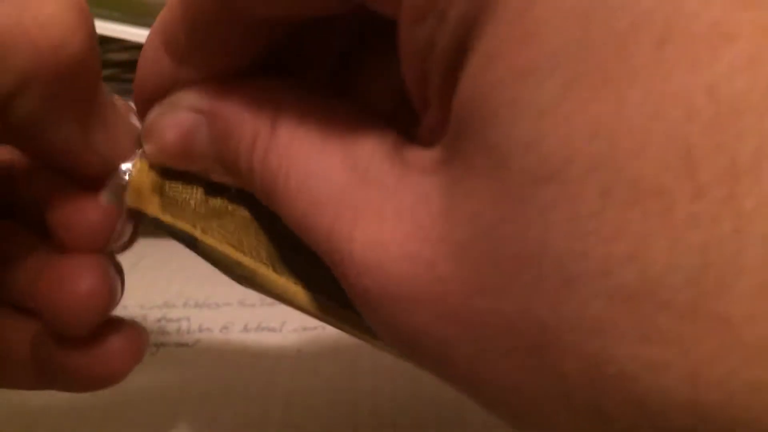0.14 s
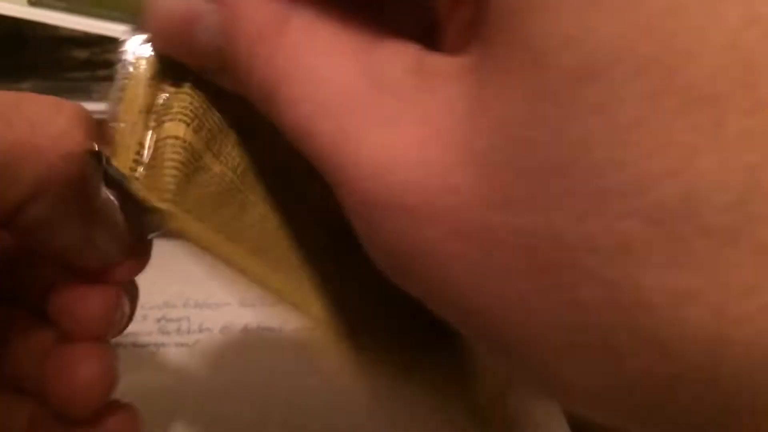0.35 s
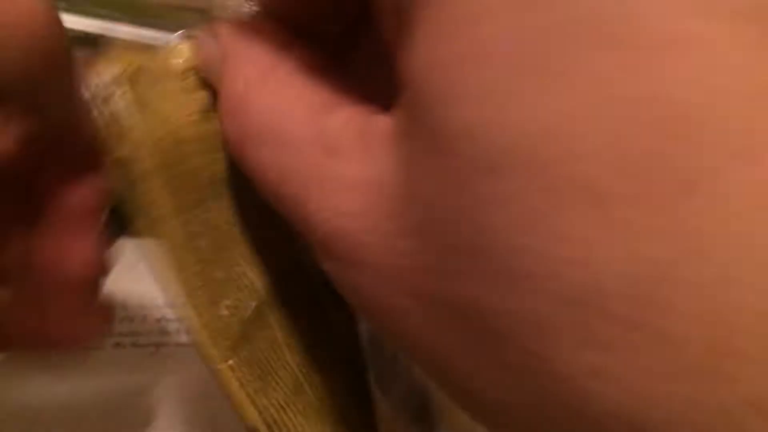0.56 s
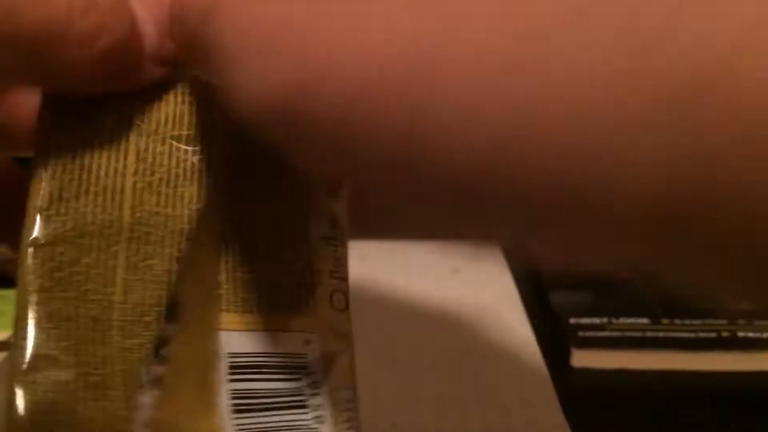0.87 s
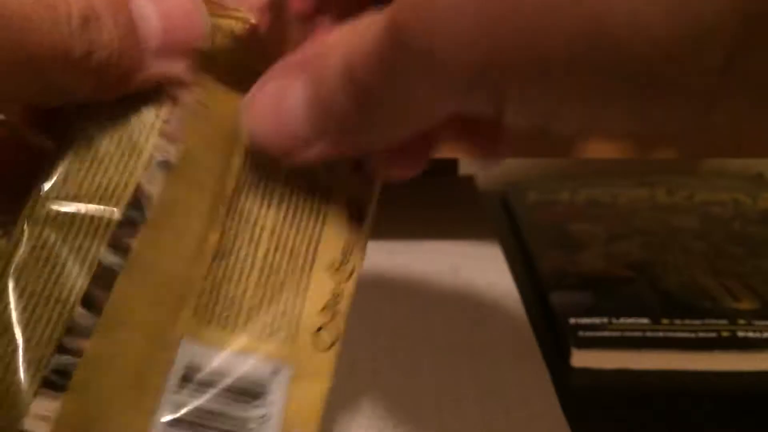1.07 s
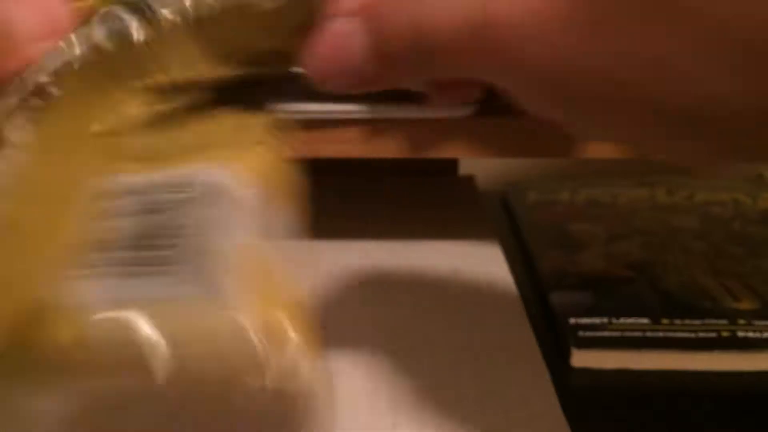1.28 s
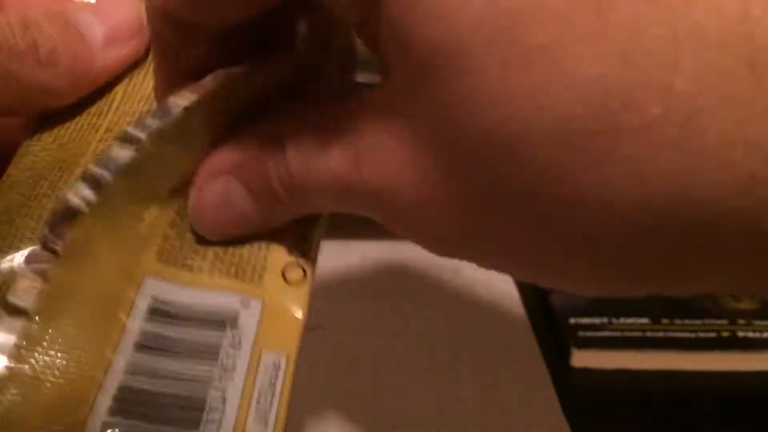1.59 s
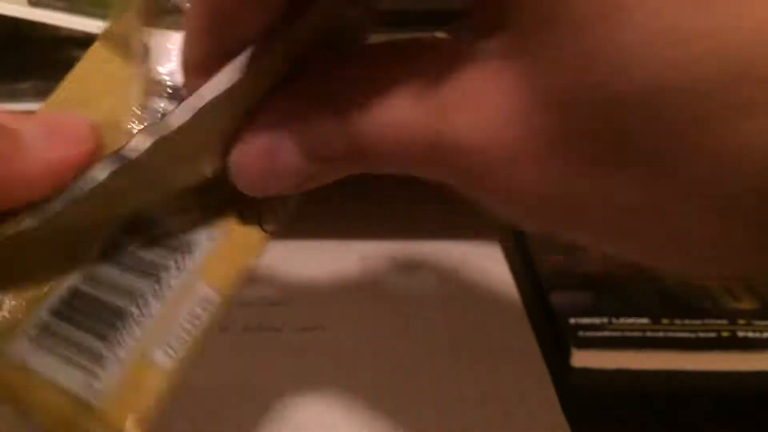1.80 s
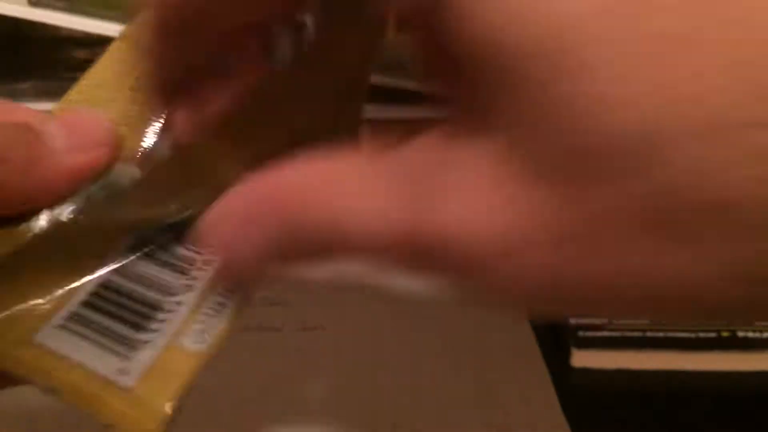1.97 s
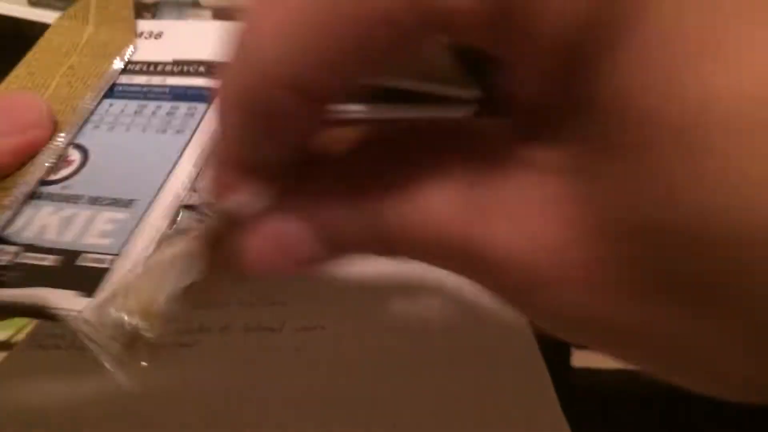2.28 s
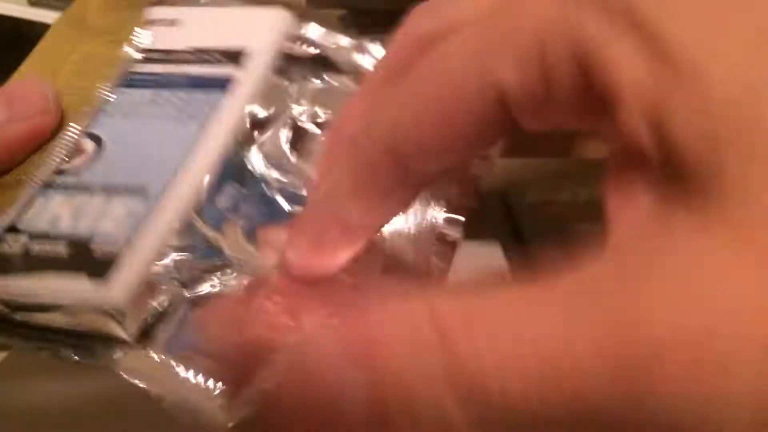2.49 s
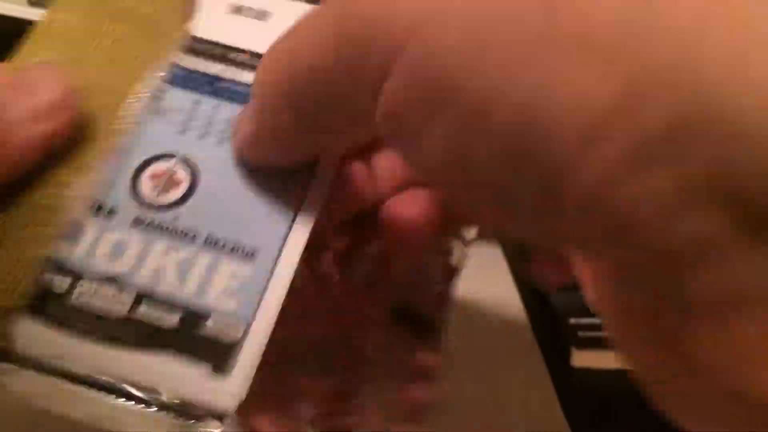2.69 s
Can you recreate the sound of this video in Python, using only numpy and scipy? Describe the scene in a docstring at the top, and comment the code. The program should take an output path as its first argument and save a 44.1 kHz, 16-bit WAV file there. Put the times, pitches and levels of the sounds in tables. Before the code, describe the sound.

Crisp foil crackling, close to the microphone in a small quiet room: a card pack is picked at, pulled open in brief rips with a few pops, then peeled back, while fingers softly knock and rub on it.

```python
"""Opening a foil pack of trading cards

The pack is picked at, pulled open and peeled back, close up in a quiet room. Every crease that buckles gives a
short click with its own colour: singly as snaps, scattered as crinkle, in fast runs as the seam rips. The pack
pops as it gives way, hands knock on the pack and the desk, fingers rub on the cards, and the loudest peaks
overload."""
import sys
import numpy as np
from scipy import signal
from scipy.fft import rfft, irfft, next_fast_len
from scipy.io import wavfile

SR = 44100
rng = np.random.default_rng(int(sys.argv[2]) if len(sys.argv) > 2 else 0)


def inscribe(sig):
    """Save sig as 16-bit PCM at rate SR to the path in sys.argv[1].

    A 1-D sig is mono; a 2-D sig holds one channel per row.
    Samples are clipped to [-1, 1] before scaling.
    """
    pcm = np.round(np.clip(np.atleast_2d(sig).T, -1, 1) * 32767)
    wavfile.write(sys.argv[1], SR, pcm.astype(np.int16))


N = 125685
T = np.arange(N) / SR

# tone of the room rumble, rubbing skin, skin sliding on foil and a foil click (frequency [Hz], level [dB])
ROOM_EQ = [(20, -15), (55, 6.5), (90, -8), (300, -20), (1000, -53), (16000, -60)]
RUB_EQ = [(20, 17), (60, -2), (220, 2), (600, -5), (8000, -22.5)]
SLIDE_EQ = [(300, -22.5), (1600, -6), (4000, -9), (16000, -16.5)]
FOIL_EQ = [(40, -16), (150, -12), (400, -9.5), (800, -4), (1150, -3), (1600, -2.5), (2050, -2.5),
           (3300, 0.5), (5000, 1.5), (7000, 2.5), (10500, 2.5), (13500, 0.5), (16000, -12.5)]
# skin rubbing on the pack (time [s], level [dB])
RUB_FADER = [(.28, -62), (.38, -53), (.47, -68), (.6, -36), (.80, -47.5), (.87, -45), (1.26, -64),
             (1.37, -31.5), (1.44, -59.5), (1.75, -49.5), (1.86, -39.5), (1.97, -54.5), (2.6, -46),
             (2.85, -58)]
# thumb drags as the seam is pulled (centre [s], half length [s], level [dB], resonance [Hz])
THUMB_DRAGS = [(.72, 0.061, -45.5, 1920), (0.965, 0.25, -49.5, 1570)]
# hands knocking on the pack and the desk (time [s], level [dB], pitch [Hz], attack [s])
FINGER_KNOCKS = [(.337, -20, 58, 0.0073), (0.514, -41.5, 220, 0.0247), (0.531, -33.5, 472, .003),
                 (0.591, -41, 207, 0.0064), (0.631, -32, 197.5, 0.0033), (.651, -32, 203, 0.0076),
                 (0.683, -31.5, 178.4, 0.005), (0.717, -33, 128, 0.0041), (0.759, -39, 61.3, 0.013),
                 (1.146, -36, 137, 0.015), (1.39, -29.5, 85, 0.0019), (1.823, -30.5, 232, 0.0017),
                 (2.048, -38.5, 127, 0.0042), (2.540, -29, 96, 0.0022), (2.618, -29, 226, 0.0028),
                 (2.722, -28, 123.6, 0.0018)]
# grip while picking at the corner, pulling, spreading the seam and peeling back (time [s], level [dB])
GRIP_PICK = [(.18, -67.5), (.235, -37.5), (.285, -48), (.32, -60), (.36, -31), (.42, -34.5), (.485, -45.5),
             (.54, -32.5), (.58, -51), (.625, -30.5), (.69, -62), (.76, -30.5)]
GRIP_PULL = [(.85, -33.5), (.95, -27), (1.0, -38), (1.19, -30.5)]
GRIP_SPREAD = [(1.40, -29), (1.55, -26.5), (1.595, -46.5), (1.64, -24.5), (1.675, -34.5), (1.73, -48.5),
               (1.80, -28.5), (1.85, -20.5), (1.93, -24.5), (1.97, -40), (2.02, -35.5)]
GRIP_PEEL = [(2.11, -39.5), (2.22, -30.5), (2.26, -20.5), (2.395, -29.5), (2.485, -43.5), (2.52, -31.5),
             (2.63, -28.5), (2.67, -45.5), (2.722, -36), (2.80, -49.5), (2.84, -35.5)]
# low-shelf body that the cards and wrapper lend a click (time [s], gain [dB])
CLICK_BODY = [(.08, -13), (.24, 16), (.55, 13), (.85, 1.5), (1.25, -13.5), (1.55, 4), (1.7, -15.5),
              (1.88, -6), (2.15, -8), (2.33, 8.5), (2.48, 10.5), (2.84, 11)]
# resonances of the stretched wrapper (frequency [Hz], width [Hz], gain [dB])
WRAPPER_MODES = [(1620, 380, -8), (3100, 200, -7)]
# the pack giving way (time [s], level [dB])
PACK_POPS = [(0.3446, -9.5), (0.354, 0.5), (0.4094, -8), (1.3156, -3), (1.8638, 4), (2.257, -8)]
# the seam ripping (time [s], length [s], level [dB], tilt [dB/octave], rib rate [1/s], flap pitch [Hz])
SEAM_RIPS = [(0.362, 0.015, -10.5, 4.5, 980, 6600), (0.379, 0.037, -14.5, 1.5, 780, 5130),
             (0.815, 0.016, -20.5, 5, 360, 5950), (1.169, 0.04, -16.5, 0.5, 496, 3900),
             (1.21, 0.064, -15, 3, 440, 5900), (1.272, 0.0249, -27, -1, 510, 4340),
             (1.336, 0.051, -15, -1.5, 580, 3750), (1.633, 0.0086, -22, -3, 500, 3120),
             (1.871, 0.028, -16, 0.5, 700, 4500), (2.048, 0.01, -27.5, -7, 980, 4860),
             (2.263, 0.023, -16, 4.5, 920, 3570), (2.288, 0.036, -17.5, -2, 630, 3430)]
# single creases snapping (time [s], level [dB], ring pitch [Hz])
CREASE_SNAPS = [(0.0814, -27, 3360), (0.2203, -29.5, 12340), (.235, -26, 3700), (0.247, -18.5, 10800),
                (0.2605, -28, 3140), (0.2856, -30, 8100), (.3445, -20, 7000), (0.4192, -19.5, 4960),
                (.463, -23, 8300), (.518, -25, 6200), (0.5602, -26.5, 3765), (.592, -22.5, 2880),
                (0.6389, -20.5, 6950), (.6632, -19.5, 8130), (.677, -24.5, 8950), (0.7045, -25, 7630),
                (0.7224, -28, 12500), (0.7362, -22, 11500), (.7425, -29, 2730), (.752, -22.5, 10500),
                (.8103, -14.5, 6140), (0.866, -15, 11600), (0.9216, -22, 3900), (0.9811, -19.5, 3050),
                (0.9842, -12.5, 6240), (1.011, -18, 5750), (1.0589, -25, 2500), (1.0925, -24, 11100),
                (1.1148, -24, 7000), (1.1392, -18, 5940), (1.1822, -10.5, 4070), (1.3219, -9, 6900),
                (1.3316, -14, 5100), (1.4196, -18, 9550), (1.4352, -14.5, 8300), (1.451, -18, 5000),
                (1.489, -17.5, 2600), (1.5474, -11.5, 6240), (1.6373, -15, 6700), (1.6439, -19.5, 3050),
                (1.674, -25, 7000), (1.684, -22.5, 2960), (1.713, -25, 5700), (1.751, -22.5, 4510),
                (1.7689, -19, 4460), (1.8163, -11, 6460), (1.8308, -13.5, 9600), (1.8403, -16, 8700),
                (1.923, -15, 2980), (1.9451, -16, 6940), (1.9751, -27.5, 7200), (2.0303, -20.5, 4660),
                (2.0518, -16, 3800), (2.1664, -17.5, 3780), (2.1773, -12.5, 4370), (2.237, -8.5, 5100),
                (2.2574, -12.5, 3560), (2.2972, -12, 6000), (2.314, -13, 3530), (2.3371, -9, 7500),
                (2.3622, -16.5, 5300), (2.398, -18, 4090), (2.4674, -27, 3030), (2.508, -26.5, 7800),
                (2.5256, -18, 5380), (2.5734, -25, 6500), (2.602, -21.5, 3800), (2.637, -22, 5400),
                (2.652, -25, 3400), (2.8369, -20.5, 2580)]

CREASE_HZ, CREASE_OCTAVES = 4960, 0.66  # centre and spread of the creases' pitches
CLICK_WINDOW_S = .003  # a click's level is its energy spread over this time


def amp(db):
    """Decibels to gain."""
    return 10 ** (np.asarray(db) / 20)


def curve(rows, t):
    """Straight lines through (time, value) points."""
    return np.interp(t, *np.array(rows).T)


def eq_curve(points, size):
    """An EQ in dB on the bins of a transform."""
    hz, db = np.array(points).T
    return np.interp(np.log(np.fft.rfftfreq(size, 1 / SR) + 1), np.log(hz), db)


def noise(eq):
    """Coloured noise of rms 1."""
    size = next_fast_len(N)
    coloured = irfft(rfft(rng.standard_normal(size)) * amp(eq_curve(eq, size)), size)[:N]
    return coloured / coloured.std()


def ring(x, hz, width):
    """One resonance, gain 1 at its centre."""
    return signal.lfilter(*signal.iirpeak(hz, hz / width, fs=SR), x)


def room_tone():
    """The faint low rumble of a quiet room."""
    return amp(-60.5) * noise(ROOM_EQ)


def reflections(x, t60_s, size=16384):
    """Diffuse reflections that arrive after 2 ms and fade away."""
    t = np.arange(size) / SR
    tail = rng.standard_normal(size) * np.exp(-np.log(1000) * t / t60_s) * (t > .002)
    return signal.fftconvolve(x, tail / np.linalg.norm(tail))[:N]


def friction(centre_s, half_length_s, db, hz, width_hz):
    """One rubbing stroke: resonant noise under a smooth, flat-topped swell."""
    rasp = ring(ring(rng.standard_normal(N), hz, width_hz), hz, 2 * width_hz)
    swell = np.exp(-((T - centre_s) / half_length_s) ** 4)
    return amp(db) * swell * rasp / rasp.std()


def card_rub():
    """The stack of cards rubs with a low hollow note as the wrapper is peeled off."""
    return friction(centre_s=2.527, half_length_s=0.18, db=-45.5, hz=327, width_hz=114)


def thumb_drags():
    """The thumb drags over the foil with a midrange rasp."""
    return sum(friction(*drag, width_hz=700) for drag in THUMB_DRAGS)


def grip(t):
    """How hard the fingers work the foil, as a fader in dB."""
    return curve(GRIP_PICK + GRIP_PULL + GRIP_SPREAD + GRIP_PEEL, t)


def skin():
    """Skin hisses as it slides over the foil and rubs dully on the pack."""
    grip_db = grip(T)
    light_touch_db = 0.48 * np.minimum(grip_db + 36, 0)  # the hiss falls off faster under a light grip
    slide = amp(grip_db + light_touch_db - 9) * noise(SLIDE_EQ)
    return slide + amp(curve(RUB_FADER, T)) * noise(RUB_EQ)


def knocks():
    """Hands thud on the pack and the desk, each a soft push on a damped resonance."""
    out = np.zeros(N)
    for start, db, hz, attack in FINGER_KNOCKS:
        t = np.maximum(T - start, 0)
        envelope = t / attack * np.exp(np.maximum(1 - t / attack, -20))
        out += amp(db + 1.5) * envelope * np.sin(2 * np.pi * hz * t)
    return out


def pops(rise_s=0.00025, fall_s=0.00045, heave_hz=72.5, heave_s=0.0031):
    """The taut pack gives way: pressure swings sharply over, inside a slower heave of the air."""
    out = np.zeros(N)
    for start, db in PACK_POPS:
        t = T - start
        swing = -np.sign(t) * np.exp(-np.minimum(abs(t) / np.where(t < 0, rise_s, fall_s), 20))
        heave = -np.sin(2 * np.pi * heave_hz * t) * np.exp(-np.minimum(abs(t) / heave_s, 20))
        out += amp(db - 3.5) * (swing + amp(-13) * heave)
    return out


def crease_colour(times, ring_hz, tilt, body_db, size, peak_db=8, q=7, ripple_db=4, bands=22):
    """Each crease's EQ in dB: foil tone, its own pitch, tilt, chance resonances and the pack's body."""
    hz = np.fft.rfftfreq(size, 1 / SR) + 1
    peak = peak_db / (1 + (q * np.log(hz / ring_hz[:, None])) ** 2)
    db_per_octave = tilt + 3.5 * np.log2(ring_hz / CREASE_HZ)  # a higher crease is brighter overall
    brightness = np.outer(db_per_octave, np.log2(np.clip(hz, 1300, 10000) / 4000))
    band_position = np.sqrt(hz / hz[-1]) * (bands - 1)
    band_shapes = np.maximum(0, 1 - abs(band_position - np.arange(bands)[:, None]))
    ripple = ripple_db * rng.standard_normal((len(times), bands)) @ band_shapes
    body = np.outer(curve(CLICK_BODY, times) + body_db, 1 / (1 + (hz / 1000) ** 2))
    return eq_curve(FOIL_EQ, size) + peak + brightness + ripple + body


def clicks(times, db, ring_hz, tilt=0, body_db=0, crack_s=.0004, ring_s=.0013, size=512):
    """Creases buckle: first a crack, then the sheet rings briefly."""
    t = np.arange(size) / SR
    envelope = np.exp(-t / crack_s) + amp(-14) * np.exp(-t / ring_s)
    bursts = rng.standard_normal((len(times), size)) * envelope
    colour = crease_colour(times, ring_hz, tilt, body_db, size)
    # minimum-phase filtering keeps the attack sharp
    cepstrum = irfft(np.log(amp(colour))) * (1 + np.sign(np.fft.fftfreq(size)))
    waves = irfft(rfft(bursts) * np.exp(rfft(cepstrum)))
    waves *= (amp(db) * np.sqrt(CLICK_WINDOW_S * SR / np.sum(waves ** 2, axis=1)))[:, None]
    places = np.maximum(times * SR, 0).astype(int)[:, None] + np.arange(size)
    return np.bincount(places.ravel(), waves.ravel(), N)[:N]


def click_run(start, length, per_s, jitter, spread_db):
    """Times, levels and pitches for an uneven run of mostly small clicks."""
    index = np.arange(max(int(length * per_s), 1))
    late, strength, pitch = rng.random((len(index), 3)).T
    times = start + (index + jitter * (2 * late - 1)) / per_s
    db = spread_db * strength ** 2
    db -= 10 * np.log10(np.mean(amp(db) ** 2) * per_s * CLICK_WINDOW_S)  # the run averages 0 dB
    return times, db, CREASE_HZ * 2 ** (CREASE_OCTAVES * np.sqrt(12) * (pitch - .5))


def crinkle(per_s):
    """Creases buckle at random, louder as the fingers grip harder."""
    times, db, hz = click_run(0, N / SR, per_s, jitter=1, spread_db=20)
    return clicks(times, db + grip(times), hz)


def rips(release_s=0.0074):
    """The crimped seam parts rib by rib and rings the loose flap, then the run dies away."""
    out = np.zeros(N)
    for start, length, level_db, tilt, per_s, flap_hz in SEAM_RIPS:
        times, db, hz = click_run(start, length + 4 * release_s, per_s, jitter=.35, spread_db=7)
        fade_db = 20 * np.log10(np.e) * np.maximum(times - start - length, 0) / release_s
        rib_hz = np.sqrt(hz * CREASE_HZ)  # half the pitch spread of the crinkle
        ribs = clicks(times, db + level_db - fade_db - 2, rib_hz, tilt, body_db=-6)
        out += ribs + amp(-6.5) * ring(ribs, flap_hz, width=300)
    return out


def snaps(followers=3, flurry_s=0.0022):
    """Large creases flip one at a time, each setting off a flurry of smaller ones."""
    times, db, hz = np.array(CREASE_SNAPS).T
    delays = flurry_s * (np.arange(followers) + rng.random((len(times), followers))) / followers
    flurry_times = (times[:, None] + delays).ravel()
    flurry_db = 1.48 * db - 4.5  # the flurry grows faster than the snap that sets it off
    flurry = clicks(flurry_times, np.repeat(flurry_db, followers), np.repeat(hz, followers))
    return amp(-0.5) * (clicks(times, db, hz) + flurry)


def scene():
    """Foil and hands over a desk, in a small room with a faint rumble."""
    foil = snaps() + rips() + amp(-1.5) * crinkle(per_s=260) + amp(-8) * crinkle(per_s=1100)
    foil = foil + sum(amp(db) * ring(foil, hz, width) for hz, width, db in WRAPPER_MODES)
    direct = foil + pops() + knocks() + skin() + thumb_drags() + card_rub()
    early = amp(-16.5) * reflections(foil, t60_s=.022)
    reverb = amp(-20) * reflections(direct, t60_s=0.1)
    return (direct + early + reverb + room_tone())[None]


def record(dry, low_cut_hz=51, ceiling=.85, high_cut_hz=15900):
    """The small microphone's chain thins the deepest bass, rounds off the peaks and cuts the top."""
    thin = signal.sosfilt(signal.butter(2, low_cut_hz, "highpass", fs=SR, output="sos"), dry)
    rounded = thin / (1 + (thin / ceiling) ** 4) ** .25
    return signal.sosfilt(signal.ellip(10, .2, 80, high_cut_hz, fs=SR, output="sos"), rounded)


dry = scene()
out = record(dry)
inscribe(out)
```